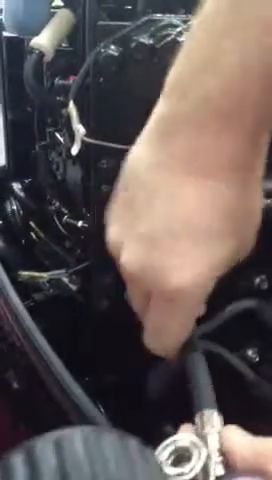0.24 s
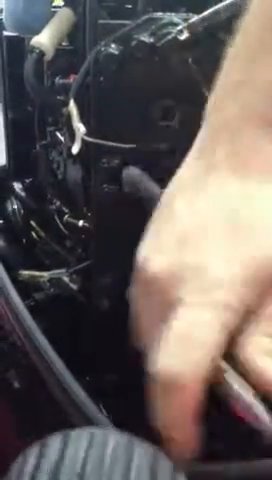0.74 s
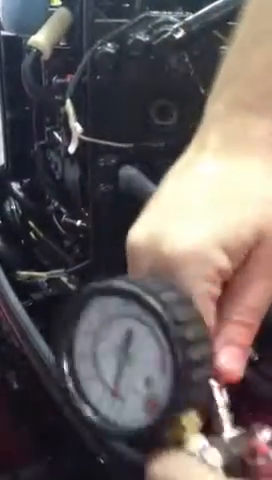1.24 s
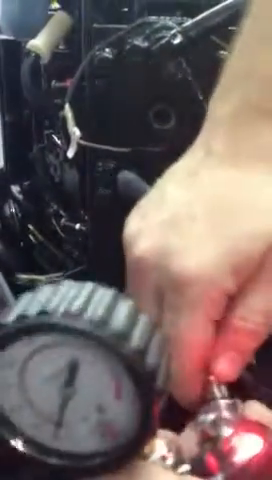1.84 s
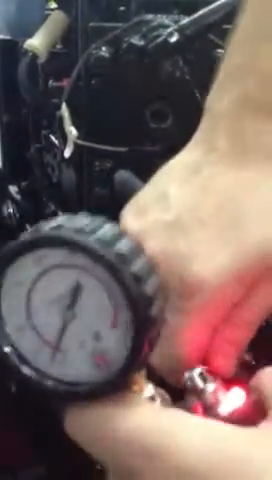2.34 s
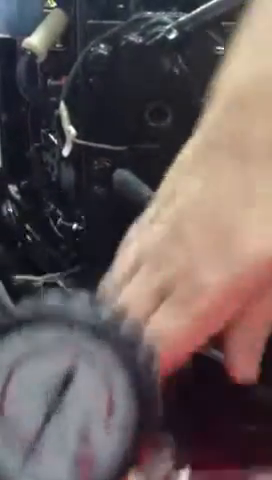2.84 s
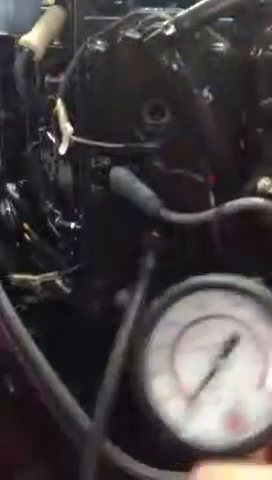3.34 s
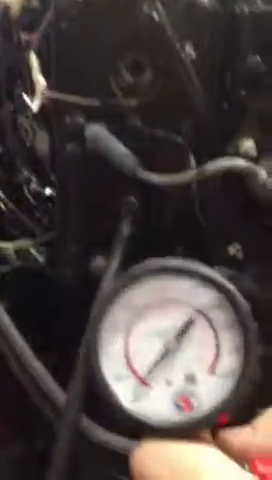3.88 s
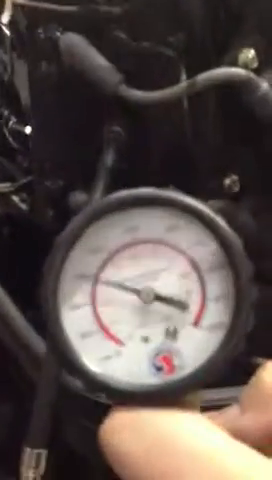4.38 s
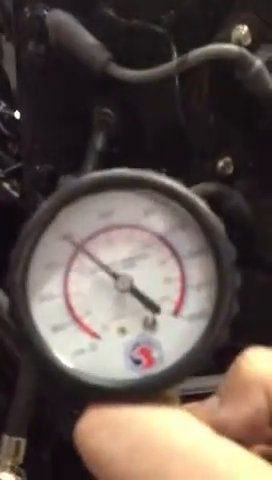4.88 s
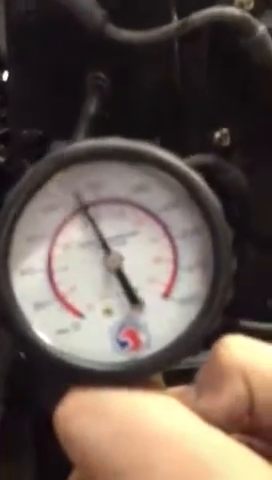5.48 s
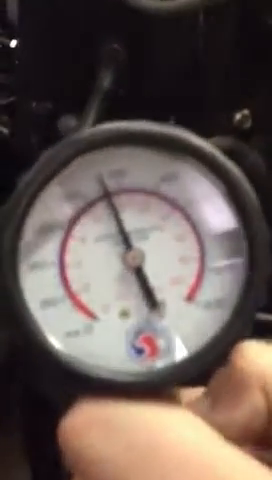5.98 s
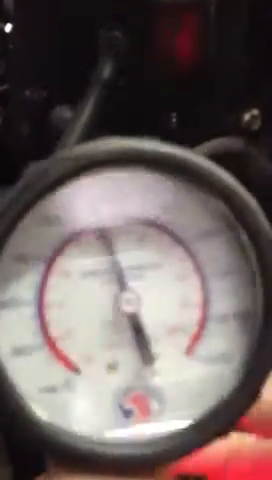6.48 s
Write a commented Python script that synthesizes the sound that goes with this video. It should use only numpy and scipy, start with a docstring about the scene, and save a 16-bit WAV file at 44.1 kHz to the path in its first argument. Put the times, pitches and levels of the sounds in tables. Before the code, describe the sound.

Near microphone beside an outboard engine. First faint room noise, then irregular bright metal clicks and brief hose scrapes as a gauge is fitted. After a lull with soft thumps on the microphone side, a very loud burst of starter clanking and gritty gear rattle leads into steady puffing chugs, five or six a second, with sputtering air, hoarse indrawn breaths of the cylinder and low crankcase throb. It never starts, and runs down abruptly at the end.

```python
"""Engine compression test

Close to an outboard engine, a gauge hose is fitted with metal clicks, rubs and soft bumps. The starter then turns
the engine over without firing: gear impacts ring the flywheel, clanks thud in the block, the crankcase throbs.
Each turn blows out a pressure pulse with jets of turbulent air, and a resonant gasp is drawn back in. Clicks are
noise bursts ringing the coupling, rubs are coloured noise, bumps are low sines; coloured noise is the quiet floor."""
import sys
import numpy as np
from scipy import signal
from scipy.fft import rfft, irfft
from scipy.io import wavfile
from scipy.ndimage import uniform_filter1d

SR = 44100
rng = np.random.default_rng(int(sys.argv[2]) if len(sys.argv) > 2 else 0)


def store_wav(level_fs):
    """Save 16-bit WAV to argv[1]."""
    pcm = np.round(np.clip(np.atleast_2d(level_fs), -1, 1) * 32767)
    wavfile.write(sys.argv[1], SR, pcm.T.astype(np.int16))


N = 296352

# Radiation of the gear contact: pitch_hz [Hz], density_db [dB per Hz]
GEAR_COLOUR = [(900, -24), (1500, -7), (2000, -12), (2850, -23.5), (3150, -0.5), (4200, -2.5), (4500, 1),
               (5750, 0), (6900, -4.5), (8200, -5.5), (9600, -28.5), (11500, -24.5), (13500, -26),
               (15500, -35)]
# Resonances of flywheel and ring gear: pitch_hz [Hz], width_hz [Hz], level_db [dB]
FLYWHEEL_MODES = [(3097, 87, 3.5), (3346, 260, -6.5), (3630, 48, 4), (3973, 170, 4), (4505, 62, 8.5),
                  (5184, 72, 7), (4960, 6.9, -17), (5070, 25, -6.5), (5600, 130, 6.5), (5810, 66, -4.5),
                  (6120, 14, 10), (8240, 140, -2.5)]
# Resonances of the engine block: pitch_hz [Hz], width_hz [Hz], level_db [dB]
BLOCK_MODES = [(320, 91, 5.5), (830, 850, -3.5), (1400, 980, -2.5), (2060, 350, 1)]


def starter(gear_db, teeth_per_s=450, spread_db=-0.5, flutter_db=1.74, friction=1.0, slack_db=5.5, relief_db=3.5):
    """Forced vibration: uneven tooth impacts and friction ring the flywheel, with less force as the load eases."""
    impacts = rng.random(N) < teeth_per_s / SR
    strength = from_db(spread_db * np.clip(rng.standard_normal(N), -1, 1))
    teeth = impacts * strength * rng.choice([-1, 1], N)
    mesh = rms_one(rms_one(teeth) + friction * rng.standard_normal(N))

    slack = slack_db * once_a_turn(phase=0.555, width=0.13)      # the mesh goes slack in mid-turn
    relief = relief_db * once_a_turn(phase=0.14, width=0.088)    # the load eases after each chug
    mesh_db = gear_db + flutter_db * drift(110) - (slack + relief)

    rows = clanks()
    hits = strikes([(s, ring_db, t60) for s, ring_db, t60, thud_db in rows], rise_s=0.0015)
    thuds = strikes([(s, thud_db, t60) for s, ring_db, t60, thud_db in rows], rise_s=0.00085)
    force = mesh * from_db(mesh_db) + from_db(-5.0) * hits
    flywheel = ring(force, FLYWHEEL_MODES, variety_db=6.5, changes_per_s=45)
    contact = from_db(-2.0) * coloured(force, GEAR_COLOUR)
    return contact + from_db(-8.0) * flywheel + resonate(thuds, BLOCK_MODES)


# Solenoid and pinion clanks as the starter engages and lets go:
# start_s [s], ring_db [dB], ring_t60_s [s], thud_db [dB]
ENGAGEMENTS = [(4.042, -13.5, 0.041, -27.5), (4.067, -1.5, 0.03, -10), (4.11, -12, 0.043, -27),
               (4.163, -1.5, 0.033, -5.5), (4.267, -3, 0.04, -9.5), (4.283, -3.5, 0.055, -42),
               (4.325, -12, .035, -14.5), (6.639, -16, 0.026, -27)]
BACKLASH_PHASE, BACKLASH_LATER = 0.62, 0.0574   # share of a turn; its shift as the cylinder fills
BACKLASH_T60_S, BACKLASH_THUD_DB = 0.03, -32    # ring time; thud in the block, relative to the clank


def clanks():
    """Impact excitation: the starter's own clanks, and the teeth meeting again across their backlash once a turn."""
    starts = [row[0] for row in TURNS] + [STOP_S]
    rows = list(ENGAGEMENTS)
    for k, (s, *_, clank_db) in enumerate(TURNS):
        phase = BACKLASH_PHASE + BACKLASH_LATER * np.sqrt(k)
        meeting_s = s + phase * (starts[k + 1] - s)
        rows.append((meeting_s, clank_db, BACKLASH_T60_S, clank_db + BACKLASH_THUD_DB))
    return rows


# One chug a turn: start_s [s], thump_db [dB], air_db [dB], rasp_db [dB], length_s [s],
# second_spurt_delay_s [s], second_spurt_db [dB relative to the first], backlash_clank_db [dB]
TURNS = [(4.351, -10.5, -12.5, -19, 0.014, .015, -6.5, -2.5),
         (4.529, -11.5, -12.5, -23, 0.012, 0.0093, -4, -2.5),
         (4.710, -8.5, -14, -17.5, 0.0095, 0.011, -0.5, -8),
         (4.893, -16, -14, -19, 0.0041, 0.0045, 0.5, -14), (5.081, -6, -16.5, -24, 0.0088, 0.0098, -1, -13),
         (5.266, -6, -10, -20.5, .007, 0.021, -10, -15), (5.450, -8.5, -14.5, -22, .014, .025, -10, -13),
         (5.623, -8.5, -13.5, -16.5, 0.0072, 0.016, -4.5, -11),
         (5.807, -15.5, -12.5, -17, 0.0067, 0.0225, -18.5, -30),
         (5.990, -13.5, -19, -20, 0.012, 0.018, 0, -5), (6.170, -12.5, -20, -16, 0.014, 0.01, -9, -14),
         (6.358, -20, -17.5, -21.5, 0.019, 0.023, -12.5, -42)]
# Body of the air blast: pitch_hz [Hz], density_db [dB per Hz]
BLAST_COLOUR = [(30, -71), (90, -37), (180, -1.5), (350, 8), (700, 4.5), (1100, -5), (1700, -4),
                (3000, -62)]
# Rasp of the air blast: pitch_hz [Hz], density_db [dB per Hz]
RASP_COLOUR = [(400, -17.5), (1000, 8.5), (1700, 1.5), (2700, 1), (4000, -6), (6000, -9), (9000, -46),
               (15000, -54)]
SPURT_THUMP_DB = -8.5                           # the later spurts have less pressure behind them
LAST_SPURT_S, LAST_SPURT_DB = 0.0135, -10.5     # last sputter: delay and level relative to the second spurt


def chugs(rise_s=0.00047, tail_s=0.017, tail_share=0.27, thump_hz=230, swell_s=0.0021, rasp_s=0.025, ragged_db=2.5):
    """Pulsed jet noise: a port opens with a pressure pulse and a short, ragged jet of air; two more spurts follow."""
    t = np.arange(SR // 8) / SR
    pulse = (t / swell_s * np.exp(1 - t / swell_s)) ** 2 * np.sin(2 * np.pi * thump_hz * (t - swell_s))
    thump, body, rasp = np.zeros((3, N))
    for s, thump_db, air_db, rasp_db, length_s, delay_s, spurt_db, _ in TURNS:
        decay = np.exp(-(t / length_s) ** 2) + tail_share * np.exp(-t / tail_s)
        jet = (1 - np.exp(-t / rise_s)) * decay
        second_s = s + delay_s
        spurts = [(s, 0, 0), (second_s, spurt_db, SPURT_THUMP_DB),
                  (second_s + LAST_SPURT_S, spurt_db + LAST_SPURT_DB, SPURT_THUMP_DB)]
        for at, db, pressure_db in spurts:
            add(thump, at, from_db(thump_db + db + pressure_db) * pulse)
            add(body, at, from_db(air_db + db - 1.0) * jet)
            add(rasp, at, from_db(rasp_db + db + 3) * jet * np.exp(-t / rasp_s))
    air = body * turbulence(BLAST_COLOUR, even_s=0.0103)
    ragged = rasp * from_db(ragged_db * drift(900))
    return thump + air + ragged * turbulence(RASP_COLOUR, even_s=0.0036)


# Resonances of the indrawn air: pitch_hz [Hz], width_hz [Hz], level_db [dB]
GASP_MODES = [(2250, 290, 3.5), (930, 1300, -14.5)]
GASP_DB, GASP_FOLLOWS = -29, 0.22   # level at mean effort; share of the starter's swing in level


def gasps(gear_db):
    """Resonant flow noise: over half a turn after each chug, air whistles hoarsely back into the cylinder."""
    t = np.arange(N) / SR
    driven = (t > START_S) & (t < TURNS[-1][0])
    effort_db = gear_db - gear_db[driven].mean()
    flow = driven * from_db(GASP_DB + GASP_FOLLOWS * effort_db) * once_a_turn(phase=0.604, width=0.07)
    return resonate(flow * rng.standard_normal(N), GASP_MODES)


# Colour of the crankcase rumble: pitch_hz [Hz], density_db [dB per Hz]
RUMBLE_COLOUR = [(29, -70), (50, -70), (107, -4), (199, 5.5), (256, -2.5), (377, -2.5), (486, -7),
                 (704, -9), (792, -6), (906, -8), (985, -10.5), (1330, -15), (1660, -21.5), (2330, -12),
                 (2800, -13), (3640, -58), (6160, -120)]


def crankcase(rumble_db, flutter_db=0.5, throb_db=3.5, stroke_phase=0.11, count=6):
    """Amplitude modulation: the crankcase rumble throbs six times a turn as the pistons pump."""
    throb = np.cos(2 * np.pi * count * (crank_angle() - stroke_phase))
    level_db = rumble_db + 3 + throb_db * throb + flutter_db * drift(99)
    return from_db(level_db) * turbulence(RUMBLE_COLOUR, even_s=0.018)


START_S, START_TURN = 4.06, 0.344   # when cranking begins; where the crankshaft stands then, in turns
STOP_S = 6.66                       # when the crankshaft comes to rest


def crank_angle():
    """Rotation kinematics: turns made so far at every sample, a whole number at each chug."""
    times = [START_S] + [row[0] for row in TURNS] + [STOP_S]
    return np.interp(np.arange(N) / SR, times, [START_TURN, *range(1, len(TURNS) + 2)])


def once_a_turn(phase, width):
    """Periodic modulation: a smooth bump at the same place in every turn, both given as shares of a turn."""
    return np.exp(-((crank_angle() % 1 - phase) / width) ** 2)


# Hose coupling and gauge touching the engine: start_s [s], bright_tick_db [dB], dull_knock_db [dB]
CLICKS = [(0.5443, -42.5, -66), (0.6071, -36.5, -51), (0.913, -23.5, -71), (0.923, -24.5, -52),
          (0.9344, -37, -60), (1.0848, -36, -46), (1.1958, -34.5, -53), (1.2804, -48, -48.5),
          (1.36, -32, -65), (1.4602, -24.5, -66), (1.4832, -23.5, -47.5), (1.5318, -30.5, -41.5),
          (1.651, -36, -48), (1.6722, -21.5, -37.5), (1.7796, -46.5, -49.5), (1.912, -27, -47),
          (2.063, -37, -43), (2.1567, -32, -50), (2.174, -20, -40), (2.204, -28.5, -42), (2.2935, -55, -49),
          (2.3417, -23, -52), (2.38, -30, -38.5), (2.4647, -23, -47), (2.4875, -38, -42),
          (2.5125, -15.5, -49), (2.601, -31, -45), (2.6214, -38, -47), (2.6628, -37, -52),
          (2.7033, -29.5, -41), (2.984, -35, -47), (3.0272, -29.5, -48), (3.0954, -36, -52),
          (3.1567, -36.5, -40.5), (3.398, -31, -46)]
# Resonances of the coupling: pitch_hz [Hz], width_hz [Hz], level_db [dB]
COUPLING_MODES = [(2760, 43, -27.5), (2980, 930, 5), (4170, 330, 12.5), (4770, 230, -24), (6130, 79, -3.5),
                  (6400, 240, -12), (7600, 100, -28)]
# The contact's own snap: pitch_hz [Hz], density_db [dB per Hz]
TICK_COLOUR = [(520, -12.5), (1450, -6.5), (2400, -9.5), (4100, -2), (6200, 9), (8400, -4.5),
               (10200, -17.5), (15200, -17)]
# The gauge body's knock: pitch_hz [Hz], density_db [dB per Hz]
KNOCK_COLOUR = [(100, -24), (350, -12), (600, 0.5), (800, 1), (1200, -17), (2000, -12.5), (4000, -80)]
# The hose's rub: pitch_hz [Hz], density_db [dB per Hz]
RUB_COLOUR = [(180, -51), (300, -12.5), (446, -28), (744, -11.5), (1070, -27), (1970, -17.5), (4210, -3),
              (6150, -2.5), (6900, -14), (8280, -13.5), (9930, -36), (13800, -26), (15500, -37)]
TICK_T60_S, KNOCK_T60_S = 0.032, 0.039   # every touch dies away alike


def fitting(grit_db=2.5):
    """Modal excitation: touches ring the coupling in varying mixes and knock the gauge body; the hose rubs."""
    ticks = strikes([(s, tick_db, TICK_T60_S) for s, tick_db, knock_db in CLICKS], rise_s=0.001)
    ticks = ticks * from_db(grit_db * drift(2100))
    ringing = from_db(-7.5) * ring(ticks, COUPLING_MODES, variety_db=4.0, changes_per_s=25)
    snap = from_db(-6.5) * coloured(ticks, TICK_COLOUR)

    blows = strikes([(s, knock_db, KNOCK_T60_S) for s, tick_db, knock_db in CLICKS], rise_s=0.001)
    knocks = from_db(4.5) * coloured(blows, KNOCK_COLOUR)

    stick_slip_db = 0.66 * drift(120) + 2.0 * drift(650)
    rub = sliding() * from_db(stick_slip_db - 0.5) * coloured(rng.standard_normal(N), RUB_COLOUR)
    return ringing + snap + knocks + rub + shuffles()


# Strokes of the hose sliding through the hand: start_s [s], level_db [dB], swell_s [s], fade_t60_s [s]
SLIDES = [(.755, -47, 0.07, 1.2), (.915, -37, .015, 0.87), (1.31, -48.5, 0.016, .5),
          (1.38, -47.5, 0.069, 0.62), (1.65, -53, 0.021, 0.42), (1.898, -52.5, 0.0078, 0.55),
          (1.98, -50, 0.026, 1.1), (2.15, -50.5, 0.024, 0.47), (2.34, -51.5, 0.019, 1.5),
          (2.513, -34.5, .01, 0.25), (2.65, -49, 0.041, 0.22), (2.9, -52, 0.017, 1.1), (3.31, -50, 0.1, 1)]
STROKE_S, STROKE_END_S = 0.38, 0.037   # the longest that a stroke lasts; how quickly the hand stops


def sliding(waver_db=0.9):
    """Sliding friction: each stroke swells evenly, then dies away, while the pressure of the hand wavers."""
    t, power = np.arange(N) / SR, np.zeros(N)
    for s, db, swell_s, t60 in SLIDES:
        swell = np.clip((t - s) / swell_s, 0, 1)
        fade_db = -60 * np.maximum(t - s - swell_s, 0) / t60
        moving = np.clip((s + STROKE_S - t) / STROKE_END_S, 0, 1)
        power += (swell * moving * from_db(db + fade_db)) ** 2
    return np.sqrt(power) * from_db(waver_db * drift(25.23))


# The hand shifting its grip: centre_s [s], level_db [dB], half_length_s [s], pitch_hz [Hz]
SHUFFLES = [(1.41, -53, 0.091, 185), (1.676, -41, 0.0077, 590), (2.099, -50, 0.06, 704),
            (2.2, -57.5, 0.14, 158), (3.58, -60, 0.063, 168), (3.783, -56.5, 0.17, 173)]


def shuffles(width_share=0.23):
    """Band-limited friction noise: skin and rubber drag against each other in short, dull swells."""
    t, out = np.arange(N) / SR, np.zeros(N)
    for s, db, half_s, hz in SHUFFLES:
        swell = from_db(db) * np.exp(-((t - s) / half_s) ** 2)
        out += resonate(swell * rng.standard_normal(N), [(hz, width_share * hz, 0)])
    return out


# Soft handling bumps: start_s [s], level_db [dB], pitch_hz [Hz]
BUMPS = [(3.461, -40, 125), (3.495, -31, 144), (3.697, -23.5, 154), (3.761, -36, 162), (3.826, -27.5, 170),
         (3.893, -42, 178), (3.964, -28, 200), (4.025, -35, 207)]


def bumps(swell_s=0.0033):
    """Heavily damped oscillation: a soft contact swells and dies within two or three low cycles."""
    t, out = np.arange(SR // 16) / SR, np.zeros(N)
    for s, db, hz in BUMPS:
        shape = (t / swell_s * np.exp(1 - t / swell_s)) ** 2
        add(out, s, from_db(db) * shape * np.sin(2 * np.pi * hz * t))
    return out


def workshop(x, t60=0.087, delay_s=0.008):
    """Reverberation: exponentially decaying noise stands for a faint, short wash of reflections."""
    t = np.arange(SR // 2) / SR
    tail = rng.standard_normal(len(t)) * from_db(-60 * t / t60) * (t > delay_s)
    return x + from_db(-19) * signal.oaconvolve(x, tail / np.linalg.norm(tail))[:N]


# Colour of the quiet workshop: pitch_hz [Hz], density_db [dB per Hz]
SHOP_COLOUR = [(18, -61), (30, -66), (77, -2.5), (284, -3.5), (350, -10.5), (379, -8.5), (505, -13.5),
               (622, -9.5), (897, -15.5), (1170, -16.5), (1910, -15.5), (2690, -21.5), (5040, -14.5),
               (8060, -31), (15500, -38.5)]


def shop_floor(level_db=-58.5):
    """Stationary background noise: white noise takes the colour of the quiet workshop."""
    return from_db(level_db) * coloured(rng.standard_normal(N), SHOP_COLOUR)


def from_db(db):
    """Logarithmic level: decibels to amplitude gain."""
    return 10 ** (np.asarray(db) / 20)


def rms_one(x):
    """Power normalisation: scale to unit mean square."""
    return x / np.sqrt(np.mean(x ** 2) + 1e-20)


def in_time(rows):
    """Linear interpolation: curve columns at every sample."""
    s, *columns = np.transpose(rows)
    return [np.interp(np.arange(N) / SR, s, column) for column in columns]


def add(track, s, sound):
    """Superposition: mix a sound in at a time in seconds."""
    at = round(s * SR)
    track[at:at + len(sound)] += sound[:N - at]


def drift(rate):
    """Slow random modulation: straight lines join random knots, `rate` of them a second, of spread near 1."""
    steps = np.arange(N) / SR * rate
    knots = rng.standard_normal(N // 16)
    return np.interp(steps, np.arange(len(knots)), knots)


def coloured(x, spectrum, size=4096):
    """Minimum-phase filtering: a causal filter of the given spectrum; white noise keeps its power."""
    hz, db = np.transpose(spectrum)
    grid = np.log(np.maximum(np.fft.rfftfreq(size, 1 / SR), 1))
    cepstrum = irfft(np.log(from_db(np.interp(grid, np.log(hz), db))))
    # folding the cepstrum onto positive times makes the filter causal
    cepstrum[1:size // 2] *= 2
    cepstrum[size // 2 + 1:] = 0
    response = irfft(np.exp(rfft(cepstrum)))
    return signal.oaconvolve(x, response / np.linalg.norm(response))[:N]


def resonate(x, modes):
    """Modal superposition: parallel resonances of alternating sign; white noise keeps about its power."""
    out, power = 0, 0
    for k, (hz, width, db) in enumerate(modes):
        r = np.exp(-np.pi * width / SR)   # pole radius
        b = (1 - r * r) / 2 * from_db(db)
        poles = [1, -2 * r * np.cos(2 * np.pi * hz / SR), r * r]
        out = out + (-1) ** k * signal.lfilter([b, 0, -b], poles, x + 1e-18)
        power += b * from_db(db)
    return out / np.sqrt(power)


def ring(x, modes, variety_db, changes_per_s, low_hz=2700, top_hz=8000):
    """Position-dependent modal coupling: mode strengths wander as the contact moves; a band limits radiation."""
    weights = [from_db(db) * np.sqrt(width) for hz, width, db in modes]
    out = 0
    for weight, (hz, width, db) in zip(weights, modes):
        wander = from_db(variety_db * drift(changes_per_s))
        out = out + weight * wander * resonate(x, [(hz, width, 0)])
    band = signal.butter(5, [low_hz, top_hz], "band", fs=SR, output="sos")
    return signal.sosfilt(band, out) / np.linalg.norm(weights)


def strikes(rows, rise_s):
    """Chattering contact: noise bursts, rows of (start_s, level_db, t60_s), rise fast and decay exponentially."""
    t, force = np.arange(SR // 4) / SR, np.zeros(N)
    for s, db, t60 in rows:
        add(force, s, from_db(db - 60 * t / max(t60, 0.004)) * (1 - np.exp(-t / rise_s)))
    return force * rng.choice([-1, 1], N)


def turbulence(spectrum, even_s):
    """Turbulent flow: coloured noise whose power is steadied over a short span."""
    x = coloured(rng.standard_normal(N), spectrum)
    span = max(int(even_s * SR), 8)
    return x / np.sqrt(uniform_filter1d(x * x, span) + 1e-9)


# The starter's effort, a surge as it takes up the load, uneven work, then the run-down:
# time_s [s], gear_rattle_db [dB], crankcase_rumble_db [dB]
EFFORT = [(4.06, -25, -24.5), (4.12, -13.5, -26.5), (4.29, -17.5, -26.5), (4.42, -21.5, -32.5),
          (4.78, -24, -34.5), (4.97, -29.5, -39), (5.25, -26.5, -37.5), (5.6, -25.5, -36),
          (5.88, -30.5, -41), (6.05, -25, -35.5), (6.38, -30.5, -39.5), (6.58, -45.5, -52.5),
          (6.72, -54, -57)]


def scene():
    """Superposition of sources: fitting the hose, then cranking, over the quiet of the workshop."""
    gear_db, rumble_db = in_time(EFFORT)
    switch_db = np.where(np.arange(N) / SR < START_S, -120, 0)
    drive = starter(gear_db + switch_db) + crankcase(rumble_db + switch_db)
    engine = drive + chugs() + gasps(gear_db)
    return (workshop(fitting() + engine) + bumps() + shop_floor())[None]


def record(dry, low_cut_hz=85, top=0.75, cutoff_hz=15700):
    """Band limiting and soft saturation: the microphone sheds deep bass, loud peaks round off, the top is cut."""
    high_pass = signal.butter(3, low_cut_hz, "high", fs=SR, output="sos")
    thin = signal.sosfilt(high_pass, dry)
    rounded = thin / (1 + (thin / top) ** 6) ** (1 / 6)
    low_pass = signal.ellip(10, 0.1, 80, cutoff_hz, fs=SR, output="sos")
    return signal.sosfilt(low_pass, rounded)


dry = scene()
out = record(dry)
store_wav(out)
```